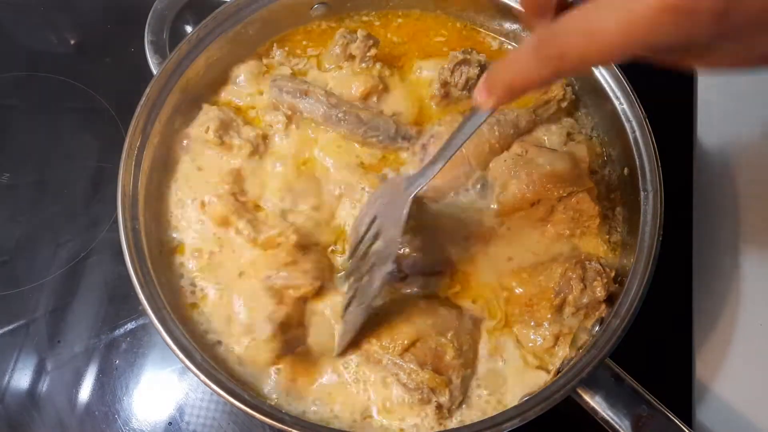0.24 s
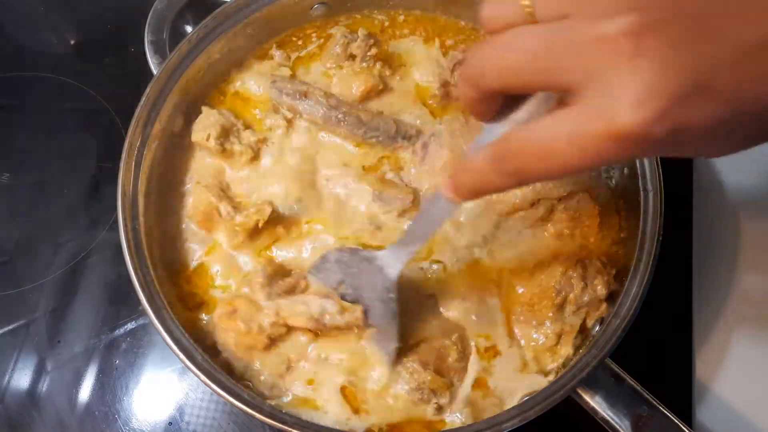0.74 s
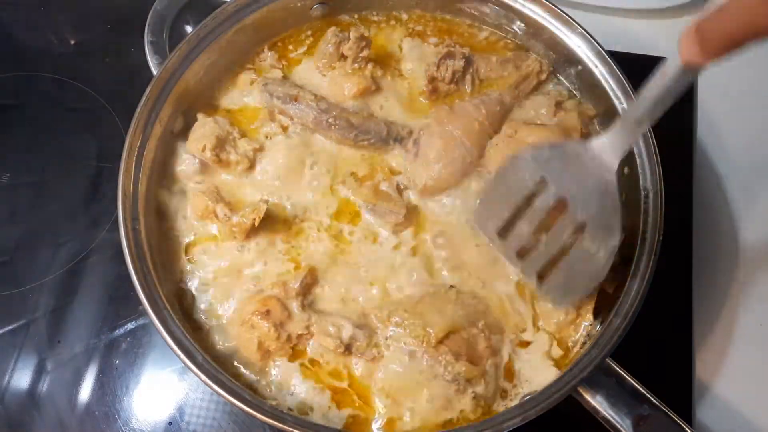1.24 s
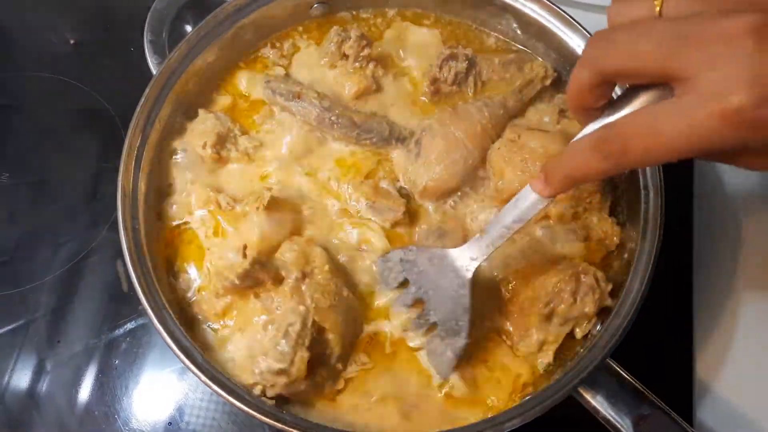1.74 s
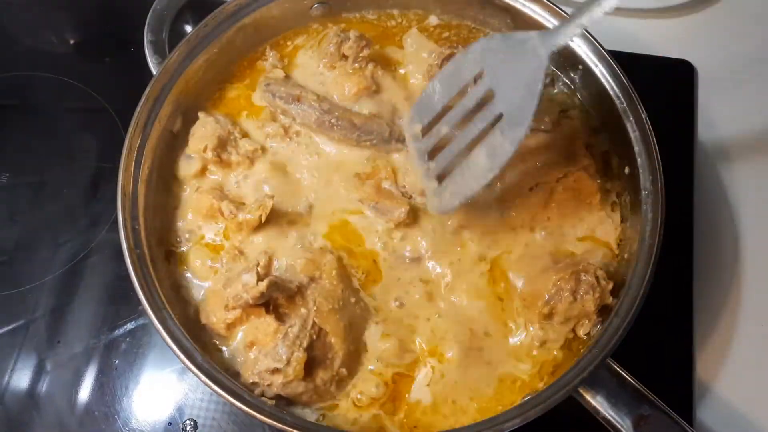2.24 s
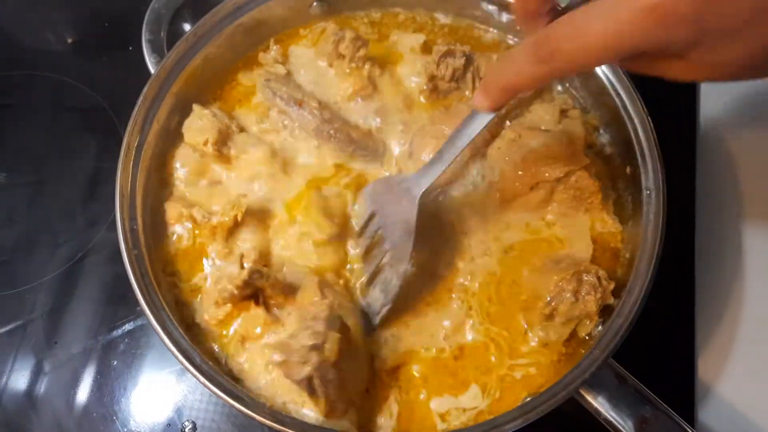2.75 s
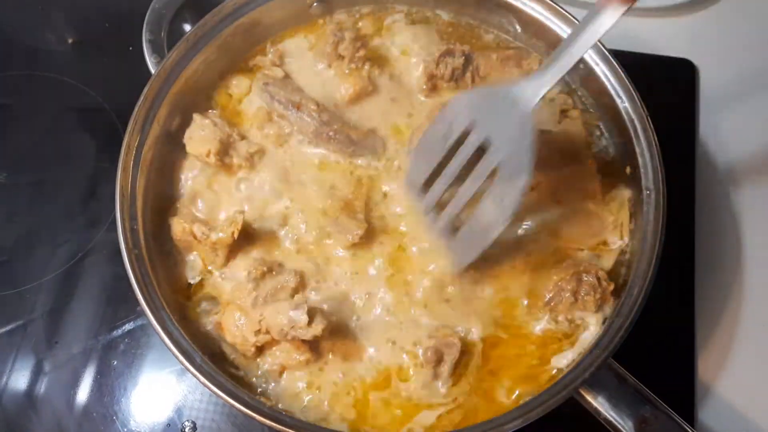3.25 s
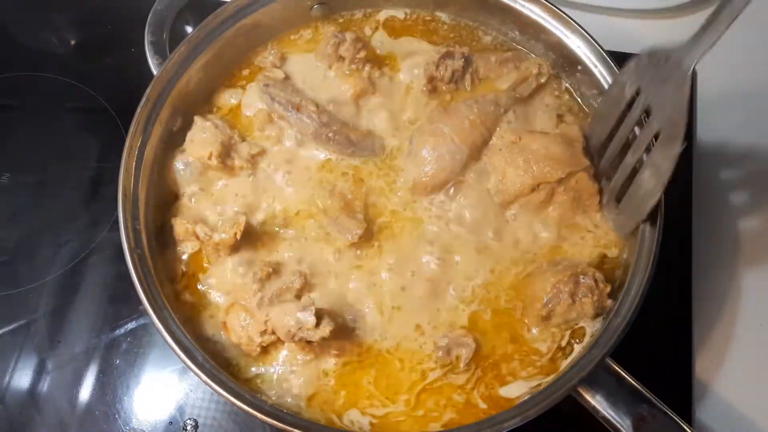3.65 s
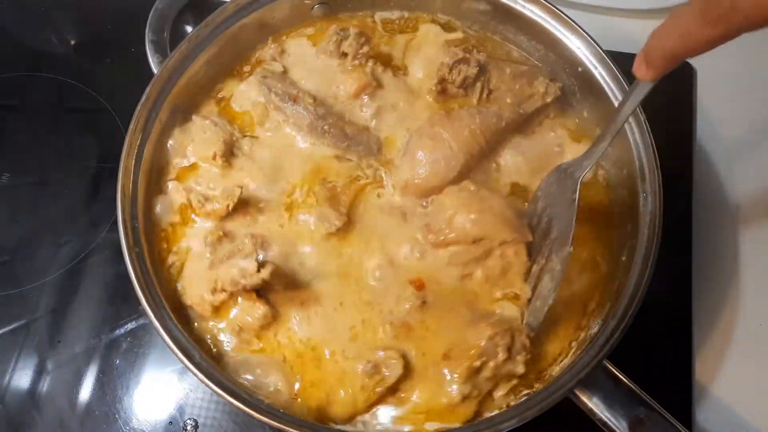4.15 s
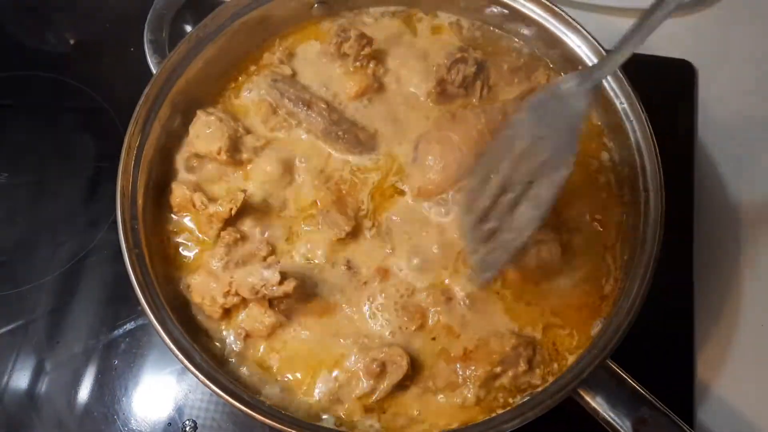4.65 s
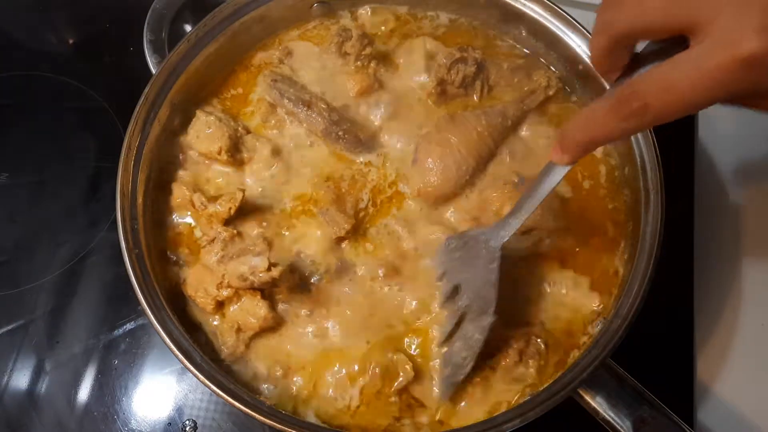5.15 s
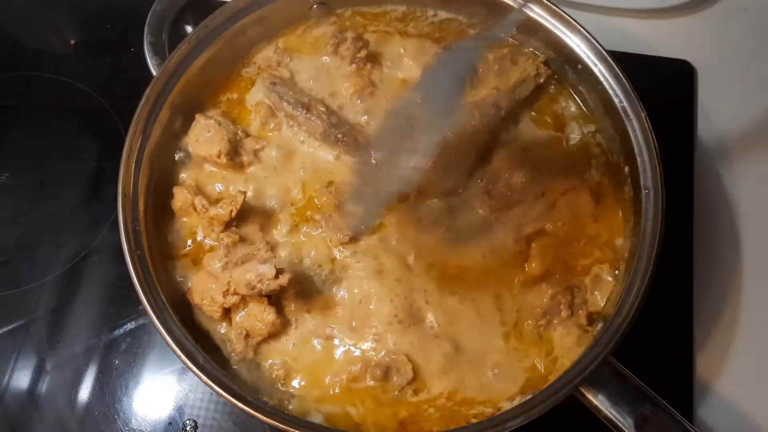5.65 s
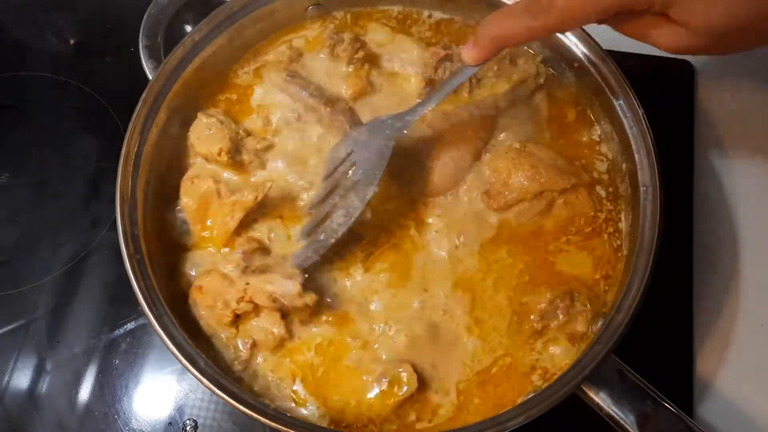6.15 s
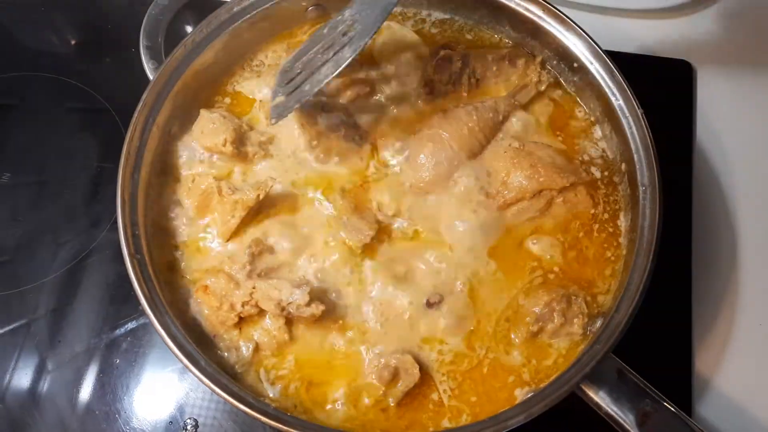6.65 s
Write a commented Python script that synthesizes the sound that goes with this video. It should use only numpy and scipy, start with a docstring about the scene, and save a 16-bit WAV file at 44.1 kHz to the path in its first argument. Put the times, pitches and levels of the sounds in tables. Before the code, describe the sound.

Close simmering stew with wet pops and fat spitting, metal spatula taps and a scraping clatter on the pan, over soft fan hum.

```python
"""Thick sauce bubbles in an open steel pan of chicken on a glass hob, over soft fan air and mains hum.
Bubbles are short damped tones that plop, smack and spray; hot fat sizzles and spits in random clicks.
Stirring gives wet bursts of noise and two sharp ticks. A slotted metal spatula scrapes, knocks on the
sauce-damped pan and once clatters on the rim: the metal is ringing tones and shaped noise.
A small kitchen adds short echoes, and one close microphone feeds both channels alike."""
import sys
import numpy as np
from scipy import signal
from scipy.fft import rfft, irfft
from scipy.io import wavfile

SR = 44100
rng = np.random.default_rng(int(sys.argv[2]) if len(sys.argv) > 2 else 0)


def digitize_waveform(pressure):
    """Quantize a signal to 16-bit integers and store it at the path in sys.argv[1].

    Rows of a 2-D input are taken as channels; values are limited to [-1, 1].
    """
    field = np.atleast_2d(pressure).T
    bounded = np.clip(field, -1, 1)
    quanta = np.round(bounded * 32767).astype(np.int16)
    wavfile.write(sys.argv[1], SR, quanta)


N = 304731
TIME = np.arange(N) / SR
BRIEF = TIME[:SR // 3]   # time within one event, in seconds

# spatula hitting the pan: start_s, thud_db, clang_db, hard_edge_db, top_of_clang_hz
KNOCKS = [(0.403, -43, -37.5, -63.5, 4460), (0.776, -40.5, -63.5, -84, 3500),
          (1.521, -38.5, -57, -80, 3820), (1.5394, -43.5, -37, -71.5, 5340),
          (2.37, -47.5, -56.5, -84, 5000), (2.787, -47, -44.5, -73, 3870), (3.6291, -46, -45.5, -51, 6500),
          (3.680, -50, -67, -64.5, 7000), (3.921, -39.5, -31, -61.5, 6470), (5.0506, -41.5, -34, -65, 3150)]
# vigour of the simmer, as the level of its deep bubbles before a small trim: time_s, level_db
BOIL = [(0.0, -67.5), (0.2, -61), (0.55, -58.5), (0.95, -64), (1.6, -55), (1.88, -57), (2.38, -57),
        (2.7, -55), (3.08, -58.5), (3.2, -63.5), (3.44, -52.5), (3.8, -55.5), (4.17, -60), (4.33, -57),
        (5.4, -56), (6.07, -60), (6.3, -54.5), (6.91, -59.5)]
USUAL_BOIL_DB = -57   # a middling boil on that scale
# tone of crackling fat and droplets: pitch_hz, relative_level_db
CRACKLE_COLOUR = [(900, -5), (1800, -5), (2600, 5), (3200, 1.5), (3800, -13), (4800, -35), (7000, -33),
                  (16000, -37)]
FIZZ_S = 0.015   # a bubble's skin fizzes this long before it tears


def from_db(db):
    """Turn decibels into a plain multiplier."""
    return 10 ** (np.asarray(db) / 20)


def rms_one(x):
    """Scale a sound to an average (rms) level of 1."""
    return x / np.sqrt(np.mean(x ** 2) + 1e-20)


def attack_one(x):
    """Scale a sound to an rms level of 1 over its first 20 ms."""
    return x / np.sqrt(np.mean(x[:SR // 50] ** 2) + 1e-20)


def at_hz(points, hz):
    """Read a table between its rows, with pitch on a log scale."""
    table = np.array(points)
    return np.interp(np.log(hz + 1e-9), np.log(table[:, 0]), table[:, 1])


def add(track, start_s, sound):
    """Mix a sound into a track at a time."""
    start = max(round(start_s * SR), 0)
    track[start:start + len(sound)] += sound[:max(N - start, 0)]


def band(x, hz, kind):
    """Gentle filter that keeps the lows, the highs or a band."""
    return signal.sosfilt(signal.butter(2, hz, kind, fs=SR, output="sos"), x + 1e-18)


def colour(x, spectrum):
    """Give a sound the tone of a spectrum table, without smearing it ahead in time (minimum phase)."""
    size = 2048
    bins_hz = np.arange(size // 2 + 1) * SR / size
    cepstrum = irfft(np.log(from_db(at_hz(spectrum, bins_hz))))
    # folding the cepstrum forward makes the filter act only after each click
    cepstrum[1:size // 2] *= 2
    cepstrum[size // 2 + 1:] = 0
    impulse = irfft(np.exp(rfft(cepstrum)))
    return signal.fftconvolve(x, impulse)[:len(x)]


def drift(rate_hz):
    """Slow random wander around zero, of spread 1."""
    step = 100   # one slow value per this many samples
    r = np.exp(-2 * np.pi * step * rate_hz / SR)
    noise = rng.standard_normal(N // step + 1002)
    slow = signal.lfilter([1], [1, -2 * r, r * r], noise)[1000:]   # skip the settling
    return np.interp(np.arange(N) / step, np.arange(len(slow)), rms_one(slow))


def fade(t60_s):
    """Decay that falls by 60 dB in t60_s."""
    return np.exp(-np.log(1000) * BRIEF / t60_s)


def ring(clicks, hz, t60_s):
    """Each unit click sets a dying sine of starting height 1 ringing."""
    r = np.exp(-np.log(1000) / (t60_s * SR))
    w = 2 * np.pi * hz / SR
    return signal.lfilter([0, np.sin(w)], [1, -2 * r * np.cos(w), r * r], clicks + 1e-18)


def grains(per_s, spread_db, size):
    """Random clicks, many small and a few large."""
    heights = from_db(spread_db * np.minimum(rng.exponential(1, size), 4))
    heights = heights * rng.choice([-1, 1], size)
    return heights * (rng.random(size) < per_s / SR)


def background():
    """Soft fan air is shaped noise; fan and mains tones waver in level and pitch."""
    # mains and fan tones: pitch_hz, rms_level_db, waver (0-1)
    hum_tones = [(49.6, -59.5, 0.16), (100.5, -75, 0.5), (132, -77, 0.3), (164.4, -79, 1),
                 (299.6, -70, 0.79), (632, -69.5, 0.25), (762, -63, 0.27), (814, -74.5, .7)]
    # tone of the fan air: pitch_hz, relative_level_db
    air_colour = [(20, -24.5), (35, -11), (50, 1), (65, 13), (100, 2), (200, -13.5), (260, -7.5), (550, -2),
                  (800, -13), (1200, -14.5), (2000, -15), (3200, -23), (4500, -31.5), (7000, -34.5),
                  (16000, -34.5)]
    tones = 0
    for hz, level_db, waver in hum_tones:
        swing = (1 + waver * drift(3.07)) / np.sqrt(1 + waver ** 2)
        phase = 2 * np.pi * hz * TIME + 3 * waver * drift(1.48)
        tones = tones + from_db(level_db) * np.sqrt(2) * swing * np.cos(phase)
    air = band(colour(rng.standard_normal(N), air_colour), 26, "high")
    return tones + from_db(-64.5) * rms_one(air)


def kitchen(x):
    """Close reflections, then a short tail whose pitch bands die at their own speeds."""
    # how long the room rings: pitch_hz, t60_s
    room_t60 = [(200, 0.36), (1000, 0.28), (3000, 0.29), (6000, 0.28), (14000, 0.25)]
    edges_hz = np.geomspace(120, 18000, 9)
    tail = 0
    for low_hz, high_hz in zip(edges_hz, edges_hz[1:]):
        noise = band(rng.standard_normal(len(BRIEF)), [low_hz, high_hz], "band")
        tail = tail + noise * fade(at_hz(room_t60, np.sqrt(low_hz * high_hz)))
    tail *= 1 - fade(0.014)
    early = rng.standard_normal(len(BRIEF)) * fade(0.041) * (1 - fade(0.0056))
    echoes = from_db(-9) * tail / np.linalg.norm(tail)
    echoes = echoes + from_db(-5.5) * early / np.linalg.norm(early)
    return x + signal.fftconvolve(x, echoes)[:N]


def rocking():
    """Each knock also rocks the whole heavy pan on the glass, a low dying hum."""
    # rocking of the pan on the hob: pitch_hz, level_db (relative to the thud), t60_s
    hob_modes = [(64.7, -11.5, 0.48), (89.7, -14.5, 0.45)]
    pushes = np.zeros(N)
    for start_s, thud_db, *_ in KNOCKS:
        add(pushes, start_s, from_db([thud_db]))   # one click
    hum = sum(from_db(db) * ring(pushes, hz, t60_s) for hz, db, t60_s in hob_modes)
    return band(hum, 450, "low")


def bubbles(low_hz, high_hz, per_s, cycles, spread_db, clump_db, spectrum):
    """Bubbles burst in clusters; thick sauce stops each after a few cycles."""
    clicks = grains(per_s * from_db(clump_db * drift(16)), spread_db, N)
    pitches_hz = np.geomspace(low_hz, high_hz, 18)
    dealt = rng.integers(0, len(pitches_hz), N)   # which pitch each click gets
    tones = 0
    for k, hz in enumerate(pitches_hz):
        tones = tones + ring(clicks * (dealt == k), hz, cycles / hz)
    return rms_one(colour(tones, spectrum))


def simmer():
    """Deep bubbles, small bubbles that swell faster with the boil, and tiny steam bubbles crackling in fat."""
    # fat sizzling where stirring bares hot metal, before a small trim: time_s, level_db
    sizzle_curve = [(0.0, -76), (0.3, -78), (0.62, -69), (0.98, -75), (1.4, -74.5), (1.69, -68),
                    (2.05, -75.5), (2.9, -72.5), (3.11, -61.5), (3.21, -85), (3.35, -61.5), (3.56, -82),
                    (4.0, -71), (4.9, -70.5), (5.27, -63), (5.6, -79), (6.37, -65.5), (6.91, -79)]
    # tone of bubbles in sauce: pitch_hz, relative_level_db
    bubble_colour = [(150, -37), (210, -17), (300, -3.5), (400, -7), (520, 3), (900, 2), (1300, 0.5),
                     (1600, -6), (2000, -10.5), (3000, -9.5), (4500, -21), (8000, -50)]
    boil_db = np.interp(TIME, *np.transpose(BOIL))
    sizzle_db = np.interp(TIME, *np.transpose(sizzle_curve))
    # small bubbles gain 1.25 dB for each dB of boil
    small_db = -66.5 + 1.25 * (boil_db - USUAL_BOIL_DB)
    deep = bubbles(258.5, 1100, per_s=450, cycles=9.0, spread_db=3.0, clump_db=3.5, spectrum=bubble_colour)
    small = bubbles(920, 2200, per_s=380, cycles=15, spread_db=4.5, clump_db=4.5, spectrum=bubble_colour)
    fine = bubbles(2090, 3860, per_s=480, cycles=22, spread_db=3.5, clump_db=7, spectrum=CRACKLE_COLOUR)
    return from_db(boil_db - 2.5) * deep + from_db(small_db) * small + from_db(sizzle_db - 1.0) * fine


def glide(hz, cycles, rise):
    """A bubble's tone starts softly and climbs as its cavity closes."""
    t60_s = cycles / hz
    pitch_hz = hz * (1 + rise * (1 - fade(3 * t60_s)))
    tone = np.sin(2 * np.pi * np.cumsum(pitch_hz) / SR)
    return tone * fade(t60_s) * (1 - fade(0.17 * t60_s))


def spray(db):
    """A skin fizzes for FIZZ_S, then tears and sprays droplets: clicks that swell and die."""
    tear = np.exp(-abs(BRIEF - FIZZ_S) / 0.0028)
    droplets = colour(grains(3000, 9.5, len(BRIEF)) * tear, CRACKLE_COLOUR)
    return from_db(db - 5.5) * attack_one(droplets)


def lesser_pops():
    """Lesser bubbles rise at loose intervals between the big ones, louder as the boil grows."""
    per_s, typical_hz, spread_octaves, spread_db = 8, 706, 0.45, 1.5
    late, high, loud, wet = rng.standard_normal((150, 4)).T
    start_s = (np.arange(1, len(late) + 1) + 0.3 * late) / per_s
    swell_db = np.interp(start_s, *np.transpose(BOIL)) - USUAL_BOIL_DB
    pitch_hz = typical_hz * 2 ** (spread_octaves * high)
    plop_db = -59.5 + swell_db + spread_db * loud
    smack_db = -65 + swell_db + spread_db * wet
    rows = np.transpose([start_s, pitch_hz, plop_db, smack_db])
    return list(rows[start_s < TIME[-1]])


def pops():
    """A bubble's cavity plops, small bubbles smack and droplets spray; spitting fat is spray alone."""
    # the biggest bubbles, levels before trims and filters: start_s, pitch_hz, plop_db, wet_smack_db
    big_pops = [(0.236, 370, -53.5, -51.5), (0.558, 520, -58, -54.5), (0.684, 510, -52.5, -68),
                (0.7, 565, -51, -52.5), (0.819, 510, -63, -52.5), (1.078, 910, -58, -49.5),
                (1.15, 580, -54, -52.5), (1.179, 710, -59, -48.5), (1.233, 783, -50.5, -59),
                (1.312, 970, -65, -50), (1.416, 558, -53, -49.5), (1.47, 680, -54.5, -55.5),
                (1.628, 630, -52, -48.5), (1.962, 500, -52, -56), (2.126, 506, -53, -53.5),
                (2.259, 1000, -57, -64), (2.281, 493, -51, -55.5), (2.664, 541, -48.5, -48),
                (2.731, 770, -57, -56), (3.037, 1030, -57.5, -56), (3.442, 387, -51, -59),
                (3.606, 1140, -55, -76), (3.749, 780, -53, -73), (4.373, 550, -53, -76),
                (4.484, 524, -56, -58), (4.581, 590, -57, -69), (4.604, 1060, -61, -52),
                (5.368, 1070, -61, -56), (5.486, 750, -55, -66), (5.67, 970, -57.5, -55.5),
                (5.91, 616, -61, -55.5), (5.94, 1045, -51, -69), (6.577, 1180, -61, -73),
                (6.697, 1030, -57, -76)]
    # hot fat spitting, level before a trim and filters: tear_s, level_db
    fat_spits = [(0.49, -58), (1.196, -55.5), (2.663, -48), (2.881, -58), (3.259, -44.5), (4.484, -57),
                 (4.696, -52), (4.843, -51.5), (5.84, -53), (6.289, -56), (6.356, -54), (6.39, -52),
                 (6.486, -56.5), (6.729, -53)]
    out = np.zeros(N)
    for tear_s, db in fat_spits:
        add(out, tear_s - FIZZ_S, spray(db))
    for start_s, hz, plop_db, smack_db in list(big_pops) + lesser_pops():
        plop = attack_one(glide(hz, cycles=22.7, rise=0.065))
        # three shorter tones at nearby pitches thicken the plop
        partners_hz = hz * np.exp(rng.normal(0.087, 0.37, size=3))
        partners = sum(glide(f, cycles=10.0, rise=0.23) * rng.choice([-1, 1]) for f in partners_hz)
        plop = plop + from_db(-1.0) * attack_one(partners)
        add(out, start_s, from_db(plop_db - 0.5) * plop)
        for k, small_hz in enumerate(rng.uniform(1103, 2250, size=3)):
            smack = attack_one(glide(small_hz, cycles=14.8, rise=0.13))
            delay_s = k * rng.uniform(0.0018, 0.0093)
            add(out, start_s + delay_s, from_db(smack_db - 7.5 - 1.1 * k) * smack)
        add(out, start_s - FIZZ_S, spray(smack_db - 13.5))   # every bubble throws a little spray
    out = band(out, 4600, "low")
    return band(band(out, 290, "high"), 290, "high")


def squelches():
    """Wet stirring bursts and two sharp ticks: random clicks swell and die within a band of pitches."""
    # wet stirring bursts, and two very short sharp ticks or spits;
    # level before a trim and filter: start_s, length_s, level_db, centre_hz
    wet_bursts = [(0.24, 0.098, -62.5, 1970), (0.674, 0.044, -53, 1390), (0.789, 0.046, -54, 2420),
                  (1.1145, 0.006, -44, 2000), (1.129, 0.092, -55, 1730), (1.184, 0.022, -45.5, 2820),
                  (1.406, 0.085, -60, 1580), (1.895, 0.051, -54, 2840), (2.358, 0.059, -53.5, 2120),
                  (2.727, 0.036, -55, 2730), (3.252, 0.024, -54, 2860), (3.266, 0.0051, -40, 2760),
                  (4.406, 0.052, -53.5, 2950)]
    out = np.zeros(N)
    for start_s, length_s, db, hz in wet_bursts:
        swell = np.sin(np.pi * np.minimum(BRIEF / length_s, 1) ** 0.89)
        burst = band(grains(2500, 1.7, len(BRIEF)) * swell, [hz / 1.44, hz * 1.21], "band")
        loudness = np.sqrt(np.sum(burst ** 2) / (length_s * SR) + 1e-20)
        add(out, start_s, from_db(db - 4.5) * burst / loudness)
    return band(band(out, 3000, "low"), 3000, "low")


def scrapes():
    """Rapid uneven contacts pump the free blade's ringing tones; light ones are duller."""
    # blade chattering and sliding on metal: start_s, rough_length_s, level_db (before dulling)
    blade_slides = [(0.44, 0.055, -61), (0.55, 0.044, -63.5), (1.607, 0.023, -49.5), (1.655, 0.017, -52.5),
                    (1.698, 0.04, -50), (3.626, 0.031, -39.5), (3.66, 0.036, -46.5), (3.702, 0.044, -48),
                    (3.771, 0.042, -52)]
    # ringing of the spatula blade: pitch_hz, relative_level_db, t60_s
    blade_modes = [(2420, -12, 0.07), (2930, -4, 0.055), (3090, 2, 0.098), (3850, -5.5, .1),
                   (4100, -1, 0.062), (4370, -5, 0.12), (4700, -13, 0.094), (5660, -16, 0.2),
                   (6099, -21, .2), (6420, -12, 0.13), (6900, -21, 0.14), (7515, -13, 0.22),
                   (10120, -10, 0.15), (11220, -17, .14)]
    # tone of the contacts themselves: pitch_hz, relative_level_db
    scrape_colour = [(300, -13), (1000, -3.5), (1900, -14), (3000, 3.5), (4200, -6.5), (5200, -19.5),
                     (6600, -10.5), (8200, -23.5), (11000, -8), (16000, -27)]
    out = np.zeros(N)
    for start_s, length_s, db in blade_slides:
        contacts = grains(1800, 3.0, len(BRIEF)) * np.clip(2 - 1.63 * BRIEF / length_s, 0, 1)
        blade = 0
        for hz, mode_db, t60_s in blade_modes:
            # contacts add energy to each tone, which leaks away as it rings
            leak = np.exp(-2 * np.log(1000) / (t60_s * SR))
            energy = signal.lfilter([1], [1, -leak], contacts ** 2)
            tone = np.sin(2 * np.pi * (hz * BRIEF + rng.random()))
            blade = blade + from_db(mode_db) * np.sqrt(energy) * tone
        rasp = attack_one(colour(contacts, scrape_colour))
        scrape = attack_one(blade) * from_db(-8.5) + rasp * from_db(0.5)
        bright_hz = np.clip(16000 * from_db(0.86 * (db + 29.5)), 2000, 18000)
        add(out, start_s, from_db(db) * band(scrape, bright_hz, "low"))
    return out


def knocks():
    """The blade hits the pan: a few clear ringing tones over a crowd of quickly damped ones."""
    # ringing of a pan full of sauce: pitch_hz, relative_level_db, t60_s
    pan_modes = [(254, -25, 0.038), (290, -4.5, 0.13), (506, 5, 0.027), (683, -1, 0.04), (852, -18, 0.034),
                 (1110, -8, 0.074), (1089, -5, 0.11), (1370, -14, 0.027), (2095, 5.5, 0.031),
                 (2600, -11, 0.013), (2465, 7.5, 0.028), (2670, -4, 0.049), (2810, -10, 0.038),
                 (2903, 8, 0.037), (3100, 8, 0.027), (3150, -32, 0.038), (3590, -1, 0.041),
                 (4020, -5.5, 0.034), (4280, -8.5, 0.053), (5300, -42, 0.041), (5700, -16.5, 0.046)]
    # tone of the crowd: pitch_hz, relative_level_db
    knock_colour = [(180, -29), (300, -2.5), (600, 4), (1100, 2), (1600, -8), (2200, -4.5), (2900, -5.5),
                    (3600, -13.5), (4500, -19), (6000, -24), (8000, -40.5), (10500, -34.5), (16000, -47)]
    out = np.zeros(N)
    for start_s, thud_db, clang_db, edge_db, top_hz in KNOCKS:
        modes = 0
        for hz, db, t60_s in pan_modes:
            # each tone's strength, sign and pitch vary at random from knock to knock
            strength = from_db(db + rng.normal(0, 1.5)) * rng.choice([-1, 1])
            shift = 1 + rng.normal(0, 0.004)
            modes = modes + strength * np.sin(2 * np.pi * hz * shift * BRIEF) * fade(t60_s)
        crowd_fade = fade(0.058) + from_db(-17.5) * fade(0.19)
        crowd = colour(rng.standard_normal(len(BRIEF)) * crowd_fade, knock_colour)
        # each knock swells in over its first few milliseconds
        blow = (attack_one(modes) + from_db(-0.5) * attack_one(crowd)) * (1 - fade(0.0062))
        thud = attack_one(band(band(blow, 1220, "low"), 1220, "low"))
        clang = attack_one(band(band(blow, 2470, "high"), top_hz, "low"))
        edge = attack_one(band(band(crowd, 7400, "high"), 7400, "high"))
        add(out, start_s, from_db(thud_db) * thud + from_db(clang_db) * clang + from_db(edge_db) * edge)
    return out


def scene():
    """The kitchen echoes the cooking sounds; everything reaches both channels alike."""
    cooking = simmer() + pops() + squelches() + scrapes() + knocks()
    mono = background() + rocking() + kitchen(cooking)
    return np.stack([mono, mono])


def record(dry):
    """The treble is cut steeply above 15.9 kHz."""
    return signal.sosfilt(signal.ellip(10, .1, 70, 15900, fs=SR, output="sos"), dry)


dry = scene()
out = record(dry)
digitize_waveform(out)
```